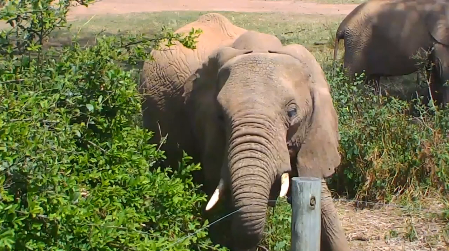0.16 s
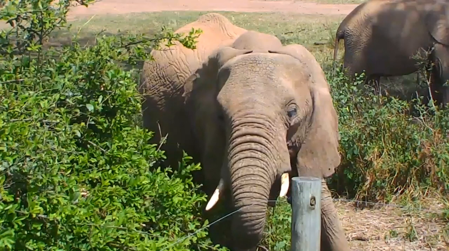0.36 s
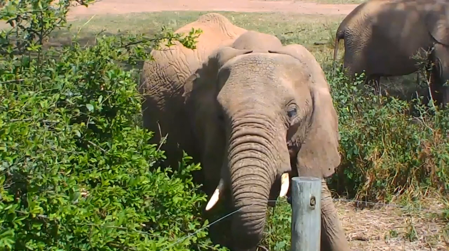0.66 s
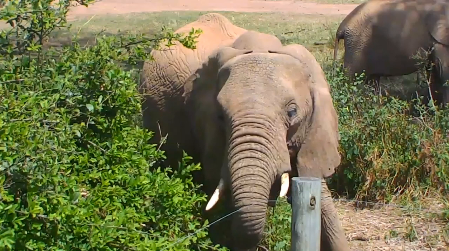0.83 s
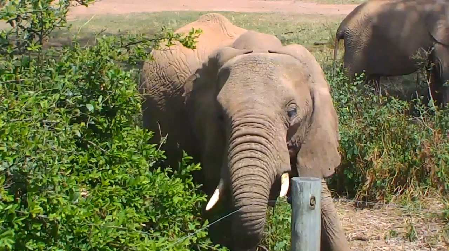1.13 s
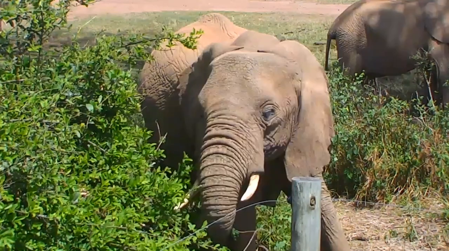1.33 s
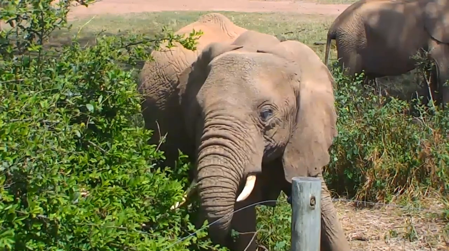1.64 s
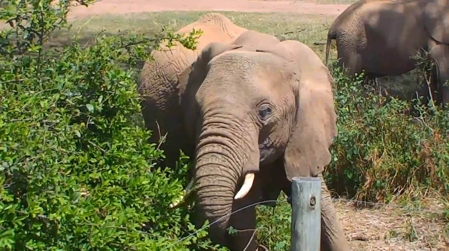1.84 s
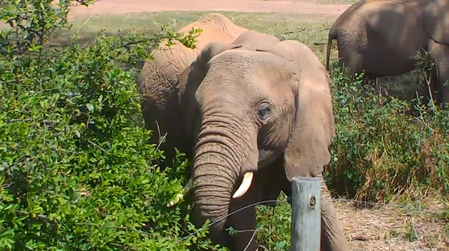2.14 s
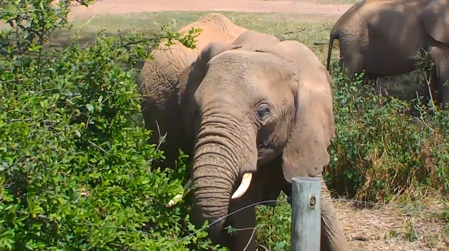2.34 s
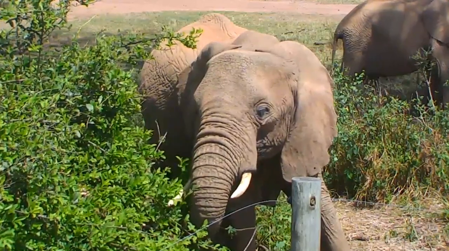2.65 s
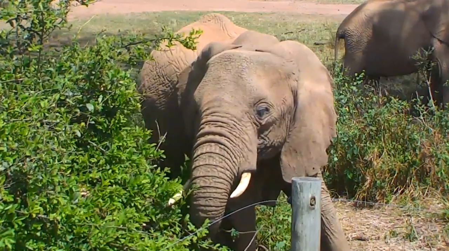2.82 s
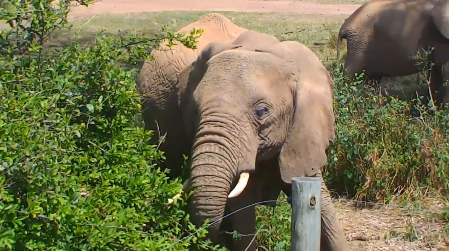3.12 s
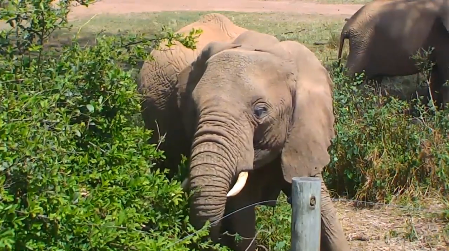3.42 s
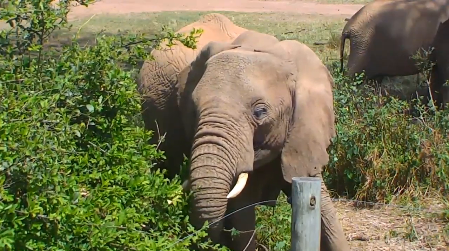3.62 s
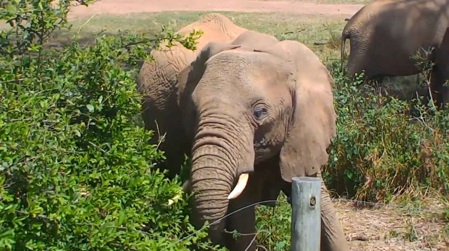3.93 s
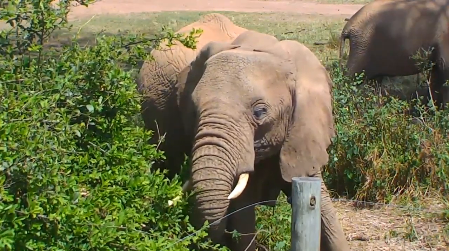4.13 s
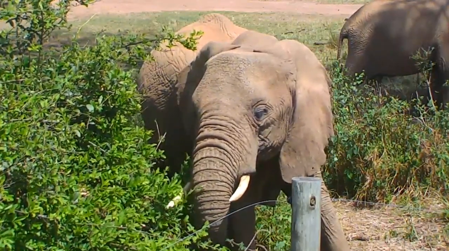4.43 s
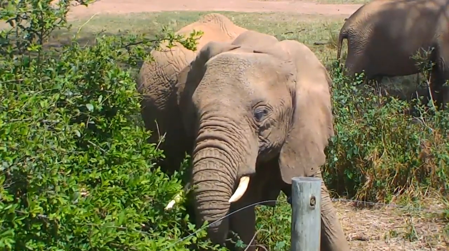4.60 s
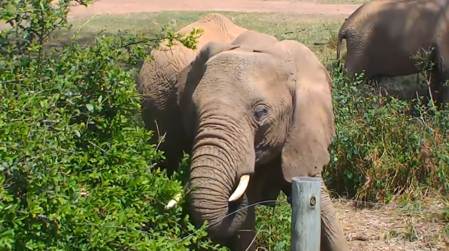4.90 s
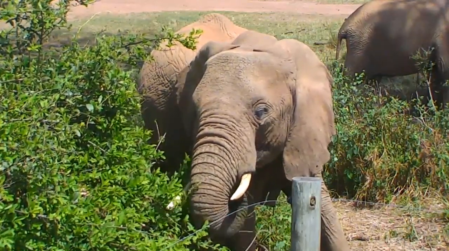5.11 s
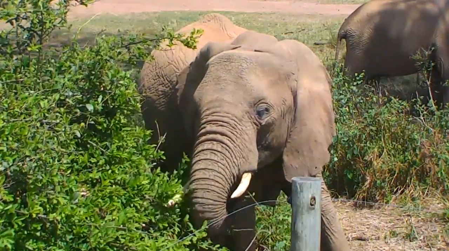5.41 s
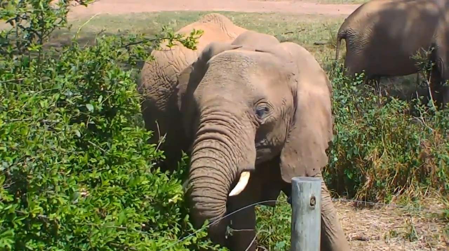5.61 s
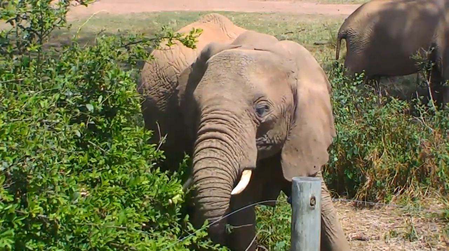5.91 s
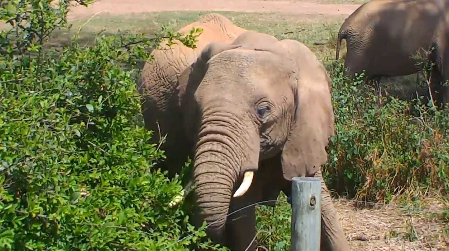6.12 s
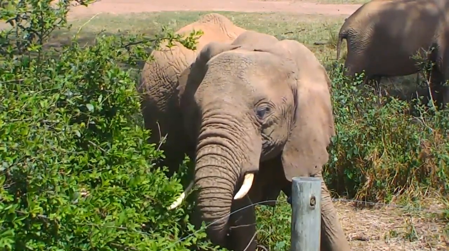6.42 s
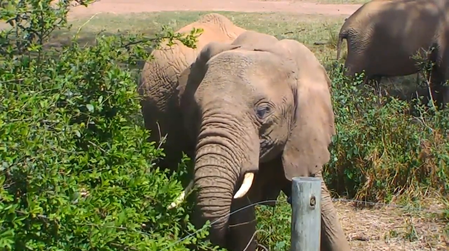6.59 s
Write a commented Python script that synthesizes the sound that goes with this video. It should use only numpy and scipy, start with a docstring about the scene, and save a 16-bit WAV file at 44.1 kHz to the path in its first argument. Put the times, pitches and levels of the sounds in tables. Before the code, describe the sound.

Daytime bush, outdoors, mono. A grasshopper rasps about fifteen strokes a second while leaves crackle faintly near a browsing elephant. Birds give rising whistles, a quick trill and dry ticks, then two loud piercing chips and a harsh rattle. The grasshopper stops; slower insect rasps, a faint cricket and a short wing buzz continue with sparse chips over low rumble.

```python
"""Small birds chip, whistle and rattle in open bush by day: swept sine tones, roughened by slow noise.
A grasshopper saws steadily and stops; its file strokes are resonant and coloured noise.
Other insects rasp, buzz and chirp, and leaves crackle as random noise bursts where an elephant browses.
A low rumble, a far engine's hum and a far chorus lie behind; the scrub scatters a thin echo of the birds."""
import sys
import numpy as np
from scipy import signal
from scipy.io import wavfile
from scipy.ndimage import uniform_filter1d

SR = 44100
rng = np.random.default_rng(int(sys.argv[2]) if len(sys.argv) > 2 else 0)


def output_pcm(signal):
    """Save a mono or channel-first signal as 16-bit PCM at the path in sys.argv[1].

    Samples are clipped to [-1, 1] before scaling.
    """
    pcm = np.clip(np.atleast_2d(signal).T, -1, 1) * 32767
    wavfile.write(sys.argv[1], SR, np.round(pcm).astype(np.int16))


N = 297675
TIME = np.arange(N) / SR

# spectrum of a bird's dry scratch: (frequency [Hz], relative density [dB per Hz])
SCRATCH_COLOUR = [(1500, -38), (1900, -12), (2250, 2), (2700, -5), (3300, 1.5), (4600, -1.5), (5300, -8),
                  (6200, -19), (8000, -34), (15000, -55)]
# spectrum of rasping wings and of leaves: (frequency [Hz], relative density [dB per Hz])
WING_COLOUR = [(2500, -15), (4000, 10), (5700, 5), (7200, -3), (8500, 2), (9700, -4), (11000, 0),
               (13000, -9.5), (14600, -4.5), (15800, -21)]


def gain_of(db):
    """Converts decibels to an amplitude factor."""
    return 10 ** (np.asarray(db) / 20)


def evened(x):
    """Normalises the mean power to 1."""
    return x / np.sqrt(np.mean(x ** 2) + 1e-20)


def read(points, hz):
    """Interpolates a spectrum on a log-frequency axis."""
    f, value = np.transpose(points)
    return np.interp(np.log(hz + 1), np.log(f + 1), value)


def level(curve):
    """Turns a dB envelope into a gain over time, silent outside its span."""
    s, db = np.transpose(curve)
    return gain_of(np.interp(TIME, s, db)) * (TIME > s[0]) * (TIME < s[-1])


def add(mix, s, sound):
    """Superposes a sound on the mix at time s."""
    start = round(s * SR)
    sound = sound[max(-start, 0):]
    part = mix[max(start, 0):][:len(sound)]
    part += sound[:len(part)]


def drift(size, hz):
    """Low-frequency random modulation: straight lines between normal random knots, hz knots a second."""
    knots = rng.standard_normal(2048)
    return np.interp(np.arange(size) * hz / SR % 2047, np.arange(2048), knots)


def noise(colour, patchy_db=0):
    """Spectral shaping of random noise to rms 1, optionally uneven in small patches of time and pitch."""
    frames, hz = N // 256 + 5, np.fft.rfftfreq(1024, 1 / SR)
    a, b, patches = rng.standard_normal((3, frames, len(hz)))
    patches = uniform_filter1d(patches, size=9, axis=0)
    patches = evened(uniform_filter1d(patches, size=7, axis=1))
    z = (a + 1j * b) * gain_of(read(colour, hz) + patchy_db * patches)
    return evened(signal.istft(z.T, nperseg=1024, noverlap=768)[1][:N])


def strikes(rows):
    """Impulse excitation from rows of (time [s], level [dB])."""
    out = np.zeros(N)
    for s, db in rows:
        add(out, s, gain_of([db]))
    return out


def bursts(impulses, rise, fall):
    """Convolution with an exponential swell and release, with time constants in seconds."""
    t = np.arange(-SR // 10, SR // 10) / SR
    return signal.oaconvolve(impulses, np.exp(np.minimum(t / rise, -t / fall)), "same")


def resonate(x, hz, width_hz):
    """Heterodyne resonance of gain 1: shifts the curve hz to zero, low-passes and shifts back."""
    turn = np.exp(2j * np.pi * np.cumsum(hz) / SR)
    r = np.exp(-np.pi * width_hz / SR)
    return 2 * (turn * signal.lfilter([1 - r], [1, -r], x / turn)).real


def tone(hz, overtone_db=-30):
    """Integrates a frequency path to phase: a sine with its weaker second harmonic."""
    phase = 2 * np.pi * np.cumsum(hz) / SR
    return np.sin(phase) + gain_of(overtone_db) * np.sin(2 * phase)


def sing(hz, waver, flutter_db):
    """Amplitude and frequency modulation of one note that swells and fades; foliage roughens it."""
    swell = np.sin(np.linspace(0, np.pi, len(hz))) * gain_of(flutter_db * drift(len(hz), 304))
    return swell * tone(hz * (1 + waver * drift(len(hz), 468)), overtone_db=-45)


def slur(length, start, middle, end, waver=.007, flutter_db=0.5):
    """A parabolic frequency glide through three pitches."""
    u = np.linspace(-1, 1, max(int(length * SR), 8))
    slope, bend = (end - start) / 2, (end + start) / 2 - middle
    return sing(middle + slope * u + bend * u ** 2, waver, flutter_db)


def background():
    """Broadband ambience: a low rumble, a far engine's wavering hum and the blur of far birds and insects."""
    # spectra below and above a gap near 1.4 kHz: (frequency [Hz], relative density [dB per Hz])
    rumble_colour = [(20, -20), (32, -9), (45, -1), (62, 1.5), (85, 0.5), (120, -1), (200, -4.5),
                     (280, -8.5), (410, -8), (540, -17.5), (690, -17), (790, -11), (910, -12), (1070, -20),
                     (1400, -21), (1900, -51), (3000, -100)]
    chorus_colour = [(1000, -17.5), (1400, -9.5), (1750, -3.5), (2050, 3), (2350, 1), (2750, -3.5),
                     (3450, 5), (4200, -4), (5150, -5.5), (5500, -10), (6200, -13.5), (7300, -20.5),
                     (8400, -17.5), (9700, -21.5), (11000, -22.5), (15500, -29)]
    # the far engine: (frequency [Hz], rms level [dB])
    hum_tones = [(110, -54.5), (239, -59.5)]
    hum = np.zeros(N)
    for hz, db in hum_tones:
        wavering = tone(hz * (1 + 0.03005 * drift(N, 14)))
        hum += gain_of(db) * evened(wavering * gain_of(4.2 * drift(N, 5.4)))
    rumble = gain_of(-44.5) * noise(rumble_colour, patchy_db=0.76)
    chorus = gain_of(-46 + .5 * drift(N, 4.1)) * noise(chorus_colour, patchy_db=2.5)
    return hum + rumble + chorus


def leaves(per_second=45, spread_db=4.5):
    """Crackle as a random impulse process: tiny cracks, a few larger, as the elephant pulls at leaves."""
    # strength of the crackling: (time [s], relative level [dB])
    browsing = [(-.1, -45.5), (1, -43), (2, -43.5), (3.3, -46), (3.9, -58), (5, -58), (6.8, -63)]
    size = gain_of(spread_db * (np.minimum(rng.exponential(1, N), 3) - 2.0))
    cracks = size * (rng.random(N) < per_second / SR)
    return level(browsing) * bursts(cracks, rise=0.0016, fall=0.0039) * noise(WING_COLOUR)


def cricket(count=26, start=3.9, period=.11, chirp_db=-53, pitch_hz=5130):
    """A nearly periodic tone-burst train: a far cricket repeats one faint, slightly falling chirp."""
    out = np.zeros(N)
    for k, (late, force_db) in enumerate(rng.standard_normal((count, 2))):
        chirp = slur(0.048, pitch_hz * 1.025, pitch_hz, pitch_hz * .985, waver=0.015, flutter_db=-2.5)
        add(out, start + k * period + .018 * late, gain_of(chirp_db + 1.1 * force_db) * chirp)
    return out


def buzz(count=23, opening_db=-7.5, opening_lead_s=0.0058):
    """Impulsive wing noise: soft opening scuffs and sharp closing ticks; the run swells, slows and fades."""
    # spectrum of the wing noise: (frequency [Hz], relative density [dB per Hz])
    buzz_colour = [(3500, -23), (5000, -2), (6200, -2), (8500, 0.5), (11000, -1.5), (12800, -10),
                   (14000, -15), (15500, -21)]
    start_s, gap_s, slowing_s = 4.558, .01464, .00058  # each gap is longer than the last by slowing_s
    middle_db, ends_db = -40.5, -9  # ends_db is relative to the middle of the run
    k = np.arange(count)
    times = start_s + gap_s * k + slowing_s * k * (k - 1) / 2
    db = middle_db + ends_db * (1 - np.sin(np.pi * (k + .5) / count))
    closing = bursts(strikes(zip(times, db)), rise=0.00091, fall=0.0014)
    opening = bursts(strikes(zip(times - opening_lead_s, db + opening_db)), rise=0.0039, fall=0.0024)
    return (closing + opening) * noise(buzz_colour, patchy_db=2.0)


def scrapes(count=16, scrape_db=-6, release=0.0075, grain_db=3.5):
    """Periodic noise bursts: a slower insect song takes over as the grasshopper stops."""
    # a single rasp and a quick pair: (time into the phrase [s], relative level [dB], swell time constant [s])
    phrase = [(0, -41.5, 0.01), (0.0632, -41, 0.015), (0.0866, -40, .007)]
    start_s, period_s = 3.6265, .20055
    starts = start_s + period_s * np.arange(count)
    rasps = np.zeros(N)
    for s, db, swell in phrase:
        levels = db + 0.79 * rng.standard_normal(count)
        rasps += bursts(strikes(zip(starts + s, levels)), rise=swell, fall=release)
    return gain_of(scrape_db) * rasps * noise(WING_COLOUR) * gain_of(grain_db * drift(N, 350))


def grasshopper(count=55, ring_db=-43.5, hiss_db=-44.5, swell_db=-5, arch=0.008,
                top_hz=5300, foot_hz=2800, width_hz=1000):
    """Stridulation: in each stroke the file speeds up and slows, so its noisy ring arches in pitch."""
    k = np.arange(count)
    times = .0522 + .0655 * k + 6.1e-5 * k ** 2  # about fifteen strokes a second, slowly tiring
    force_db, speed = rng.standard_normal((count, 2)).T
    nearest = np.rint(np.interp(TIME, times, k)).astype(int)
    offset = TIME - times[nearest]  # seconds from the nearest stroke
    peak_rise = (top_hz - foot_hz) * (1 + 0.039 * speed[nearest])
    hz = foot_hz + peak_rise * np.exp(-(offset / arch) ** 2)
    ring = resonate(rng.standard_normal(N), hz, width_hz)
    ring = evened(resonate(ring, hz, width_hz))
    # the file bites hardest just after its top speed
    grip = gain_of(force_db[nearest]) * np.exp(-((offset - .002) / 0.013) ** 2)
    beats = strikes(zip(times, 0.58 * force_db))
    stroke = bursts(beats, rise=0.0089, fall=0.0055)
    slow_swell = gain_of(swell_db) * bursts(beats, rise=0.05, fall=0.0026)
    scrape = np.maximum(stroke, slow_swell)
    hiss = scrape * noise(WING_COLOUR, patchy_db=2.0) * gain_of(1.0 * drift(N, 280))
    return gain_of(ring_db) * grip * ring + gain_of(hiss_db) * hiss


def far_birds(count=110, far_db=-49, spread_db=3):
    """Random superposition of many faint slurs from far birds; levels are before the mix."""
    out = np.zeros(N)
    for when, pitch, bend, long, size in rng.random((count, 5)):
        hz, glide = 2000 + 3200 * pitch, 0.2 * (bend - .5)
        note = slur(0.0197 + 0.0508 * long, hz * (1 - glide), hz, hz * (1 + glide / 2))
        add(out, when * N / SR, gain_of(far_db + spread_db * (2 * size - 2.0)) * note)
    return out


def distant_slurs():
    """Linear frequency glides: faint bird notes, blurred by the bush in between."""
    # (time [s], level [dB], pitch [Hz], glide [share of the pitch])
    slur_calls = [(.425, -44, 2196, -0.12), (.658, -43, 2300, .12), (.905, -45.5, 1910, -.2),
                  (1.717, -43, 2180, -0.17), (5.05, -43.5, 4750, .14), (5.255, -50, 4500, .04),
                  (6.011, -43, 2330, 0.17), (6.032, -43, 2150, -.1), (6.272, -46, 2320, 0.067),
                  (6.453, -40.5, 4640, .05), (6.495, -42, 2305, .1)]
    out = np.zeros(N)
    for s, db, hz, glide in slur_calls:
        note = slur(0.0408, hz * (1 - glide / 2), hz, hz * (1 + glide / 2), waver=0.035, flutter_db=3.5)
        add(out, s, gain_of(db) * note)
    return out


def downslurs():
    """Exponential frequency decay: each answering whistle falls quickly and settles on its final pitch."""
    # (time [s], level [dB], final pitch [Hz])
    downslur_calls = [(.513, -36, 3405), (.914, -37, 3600), (4.695, -42, 3650), (5.555, -48, 3830),
                      (5.795, -40.5, 3320), (6.505, -41.5, 3760), (6.565, -45, 3450)]
    length_s, drop, settle_s = 0.054, .27, 0.014  # drop is a share of the final pitch
    out, t = np.zeros(N), np.arange(0, length_s, 1 / SR)
    for s, db, hz in downslur_calls:
        path_hz = hz * (1 + drop * np.exp(-t / settle_s))
        add(out, s, gain_of(db) * sing(path_hz, waver=0.0075, flutter_db=0.5))
    return out


def upslurs(soft_start_db=-16, lead_s=.04):
    """Sigmoid frequency rise: the whistle starts low and soft and is loudest on the way up."""
    # (time of the steepest rise [s], level [dB])
    upslur_calls = [(-.016, -26.5), (.745, -27.5), (1.331, -23.5), (2.166, -30)]
    length_s, from_hz, to_hz, bend_s = 0.093, 2700, 4064, .02
    out, t = np.zeros(N), np.arange(0, length_s, 1 / SR) - lead_s
    climb = (1 + np.tanh(t / bend_s)) / 2
    force = gain_of(np.interp(climb, [0, .45, 1], [soft_start_db, 0, -2.5]))
    for s, db in upslur_calls:
        note = sing(from_hz + (to_hz - from_hz) * climb, waver=0.0079, flutter_db=1.0)
        add(out, s - lead_s, gain_of(db) * force * note)
    return out


def pips():
    """Brief tone bursts: very short, high scoops whose pitch dips in the middle."""
    # (time [s], length [s], level [dB], pitch [Hz])
    pip_calls = [(0.248, 0.013, -35, 5380), (.993, .009, -35, 5650), (1.363, .0075, -26, 4820),
                 (2.044, .009, -33.5, 6150), (2.344, .008, -23, 4820), (2.357, .01, -31, 4870),
                 (4.2026, 0.0053, -24, 4100), (4.2155, .0075, -31.5, 5570)]
    scoop = 0.12  # share by which the start lies above the middle; the end lies half as far
    out = np.zeros(N)
    for s, length, db, hz in pip_calls:
        note = slur(length, hz * (1 + scoop), hz, hz * (1 + scoop / 2), waver=0.022, flutter_db=3.0)
        add(out, s, gain_of(db) * note)
    return out


def trill(count=11, length=.017, first_db=-30, fade_db=-0.28, top_hz=4450, middle_hz=3600, foot_hz=3330):
    """Periodic repetition of a steep downward glide: a quick, even run that fades a little."""
    start, period = 1.163, .0279
    out = np.zeros(N)
    for k, (force, long) in enumerate(rng.standard_normal((count, 2))):
        note = slur(length * (1 + 0.13 * long), top_hz, middle_hz, foot_hz, waver=.022, flutter_db=3.0)
        add(out, start + k * period, gain_of(first_db + fade_db * k + 0.86 * force) * note)
    return out


def whistles():
    """Superposition of the whistling birds in the middle distance."""
    return pips() + upslurs() + downslurs() + distant_slurs() + trill()


def rattle(count=14, length=0.00474, sweep=0.18, scratch_db=-14, grain_db=3.5, uneven_db=1.0,
           tiring_db_per_s=-35):
    """A pulse train over a coarse rasp: effort makes its fifty flicks a second higher, louder, quicker."""
    # the harsh part: (time [s], level before the grain [dB])
    rasp_curve = [(3.45, -49), (3.467, -40), (3.55, -37), (3.61, -36), (3.72, -38.5), (3.745, -51),
                  (3.85, -49)]
    start_s, surge_s, surge_width_s = 3.457, 3.576, .013
    # (lazy, at full effort)
    flick_hz, flick_db, flick_gap_s = (2900, 4420), (-28, -17.5), (.0213, .0197)
    out, flicks, s = np.zeros(N), [], start_s
    for force in rng.standard_normal(count):
        effort = 1 / (1 + np.exp((surge_s - s) / surge_width_s))
        hz, db, gap = (lazy + (full - lazy) * effort for lazy, full in (flick_hz, flick_db, flick_gap_s))
        db += tiring_db_per_s * max(s - surge_s, 0)
        flick = slur(length, hz * (1 - sweep), hz, hz * (1 + sweep / 2), waver=0.047)
        add(out, s - length / 2, gain_of(db + uneven_db * force) * flick)
        flicks.append((s, db + scratch_db))
        s += gap
    scratch = bursts(strikes(flicks), rise=0.00056, fall=0.0023)
    rasp = level(rasp_curve) * gain_of(grain_db * drift(N, 330))
    return out + (rasp + scratch) * noise(SCRATCH_COLOUR, patchy_db=1.5)


def ticks(pip_db=-2.5, scratch_db=-10, length=0.0044, pip_hz=3450, count=22, faint_db=-34,
          from_s=1.5, until_s=3.45):
    """Transients of a few cycles with a scratch: a bird's dry ticking, with fainter ticks at random."""
    # (time [s], relative level [dB], ticks in the run [count])
    tick_runs = [(1.5825, -25.5, 1), (1.7664, -31, 1), (1.839, -30, 1), (1.932, -28.5, 1),
                 (2.0862, -28.5, 2), (2.1822, -25.5, 1), (2.2557, -26, 1), (2.2824, -29.5, 1),
                 (2.3453, -26, 3), (2.4378, -29, 2), (2.4882, -31, 1), (2.528, -26.5, 3), (3.148, -32, 1),
                 (3.3662, -29.5, 1), (3.4311, -28, 1), (6.0866, -33, 1)]
    gap_s, fade_db = .0134, -1  # from one tick of a run to the next
    rows = [(s + k * gap_s, db + k * fade_db) for s, db, run in tick_runs for k in range(round(run))]
    for when, size in rng.random((count, 2)):
        rows.append((from_s + when * (until_s - from_s), faint_db + 5 * (size - .5)))
    scratches = bursts(strikes([(s + 0.0014, db) for s, db in rows]), rise=0.00041, fall=0.0047)
    out = gain_of(scratch_db) * scratches * noise(SCRATCH_COLOUR)
    for s, db in rows:
        pip = slur(length, pip_hz * 1.08, pip_hz, pip_hz * .96, waver=0.097)
        add(out, s, gain_of(db + pip_db) * pip)
    return out


def chips():
    """Rapid frequency modulation: two scoops of pitch in about 30 ms; leaves dull some calls."""
    # pitch path of one chip: (time from the loud scoop [ms], frequency [Hz], relative level [dB])
    chip_shape = [(-19.5, 4400, -14), (-15, 3200, -14), (-9.5, 4650, -10), (-7, 6700, -23), (-5, 7100, -18),
                  (-1.4, 5400, -15), (-0.7, 4520, 0), (4, 4520, -8.5), (7, 7640, -26)]
    # (time [s], level [dB], pitch [factor], length [factor], opening scoop [dB],
    #  treble above 4.5 kHz [dB per octave])
    chip_calls = [(0.9756, -29, 1.18, 1.5, -20, 3), (1.604, -26.5, 1.06, 1.25, 0, 8),
                  (2.327, -24.5, 0.98, 1.4, -26, 19), (2.7359, -8.5, 0.998, 0.94, -7.5, -1.5),
                  (2.9094, -10, 0.96, 0.98, -1.5, 4), (3.17, -32.5, 1.12, 0.97, 11, -2),
                  (4.446, -34, 0.88, 0.99, -6, 29), (4.464, -34, 1.1, 0.85, -2, 10),
                  (5.457, -23.5, 0.97, 0.88, 3.5, -23), (5.8883, -20.5, 0.99, 0.8, -2, -28),
                  (6.108, -35, 0.9, 1.12, 11.5, 16)]
    out = np.zeros(N)
    ms, path_hz, path_db = np.transpose(chip_shape)
    for s, db, pitch, stretch, opening_db, treble_db in chip_calls:
        at = ms * stretch / 1000  # seconds from the loud scoop
        t = np.arange(at[0], at[-1], 1 / SR)
        colour_db = treble_db * np.log2(np.maximum(path_hz / 4500, 1))
        loud_db = np.interp(t, at, path_db + colour_db + opening_db * np.clip(-ms / 12, 0, 1))
        hz = pitch * np.interp(t, at, path_hz) * (1 + 0.02 * drift(len(t), 846))
        octave_db = np.interp(hz, [3400, 4200], [-11, -34])  # the octave shows only in the low scoop
        add(out, s + at[0], gain_of(db + loud_db) * tone(hz, octave_db))
    return out


def scrub(x):
    """Scattering: sparse reflections from leaves and ground decay at a rate set by frequency."""
    # reverberation: (frequency [Hz], time to fall by 60 dB [s])
    echo_times = [(1500, 0.15), (4000, 0.4), (8000, 0.18)]
    taps = rng.standard_normal(SR // 2) * (rng.random(SR // 2) < .06)
    taps[:200] = 0  # no reflection in the first 4.5 ms
    hz, t, z = signal.stft(taps, SR, nperseg=256)
    decay = gain_of(-60 * t / read(echo_times, hz)[:, None])
    tail = signal.istft(z * decay, SR, nperseg=256)[1]
    return signal.fftconvolve(x, tail / np.linalg.norm(tail))[:N]


def scene():
    """Direct-to-reverberant balance: near birds are almost dry, farther ones carry more echo."""
    near, mid, far = chips() + ticks(), whistles() + rattle(), far_birds()
    echo = scrub(gain_of(-18.5) * near + gain_of(-14) * mid + gain_of(0.5) * far)
    insects = grasshopper() + scrapes() + buzz() + cricket()
    birds = near + mid + gain_of(-10.5) * far + echo
    return (birds + insects + leaves() + background())[None]


def record(dry, low_cut_hz=38, edge_hz=15750):
    """Band-pass filtering: the microphone's low cut and upper band limit."""
    low_cut = signal.butter(5, low_cut_hz, "high", fs=SR, output="sos")
    cut = signal.sosfilt(low_cut, dry)
    band_limit = signal.firwin(511, edge_hz, window=("kaiser", 9), fs=SR)
    return signal.oaconvolve(cut, band_limit[None], "same")


dry = scene()
out = record(dry)
output_pcm(out)
```